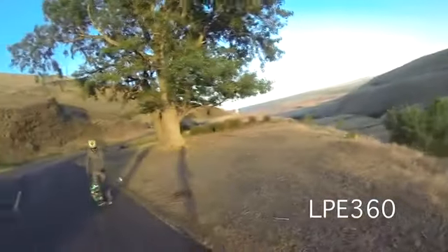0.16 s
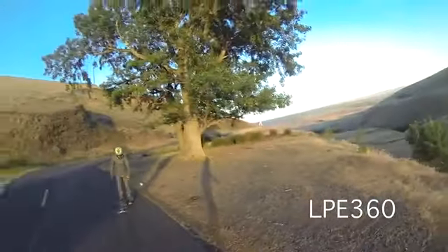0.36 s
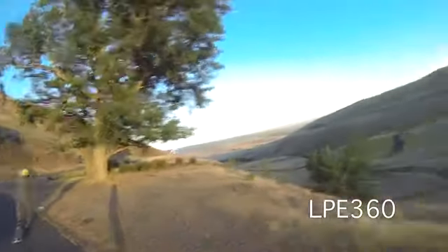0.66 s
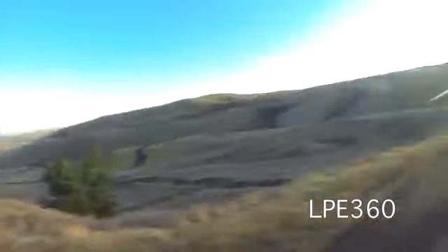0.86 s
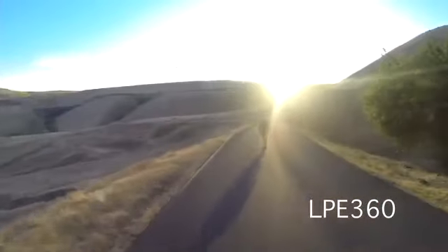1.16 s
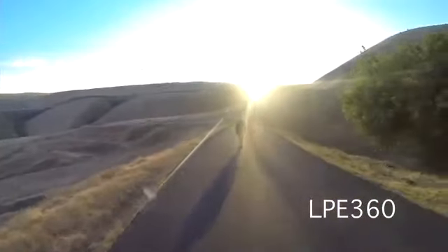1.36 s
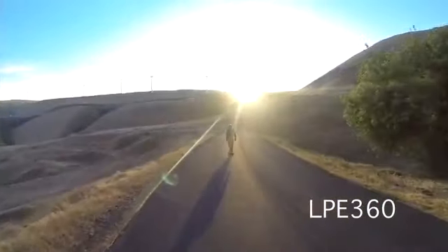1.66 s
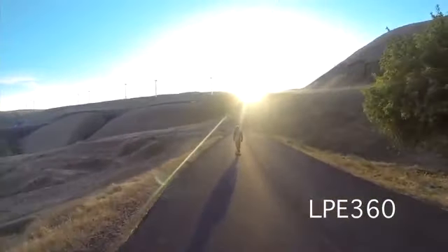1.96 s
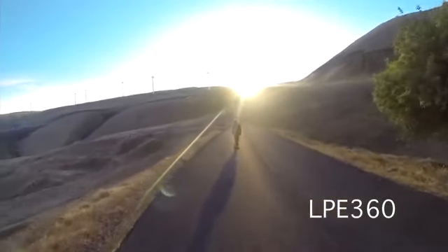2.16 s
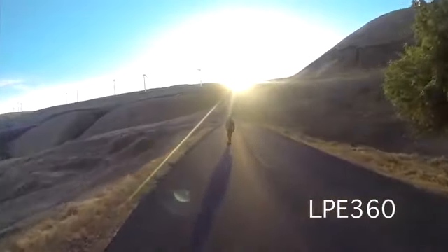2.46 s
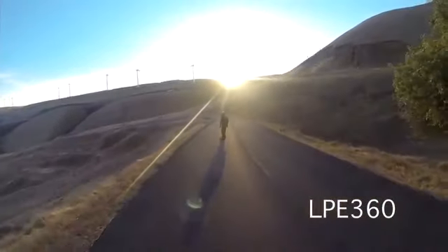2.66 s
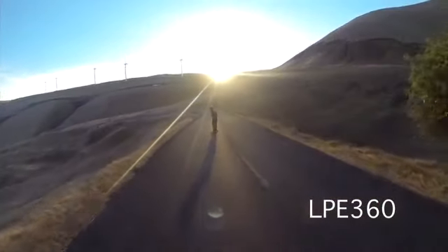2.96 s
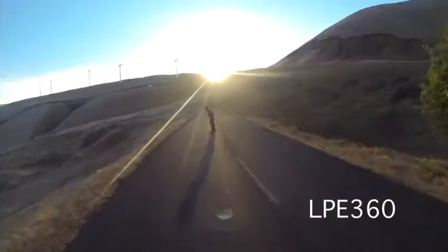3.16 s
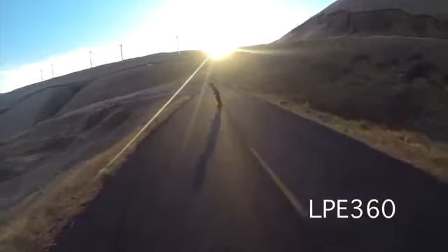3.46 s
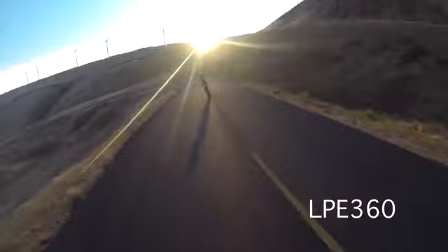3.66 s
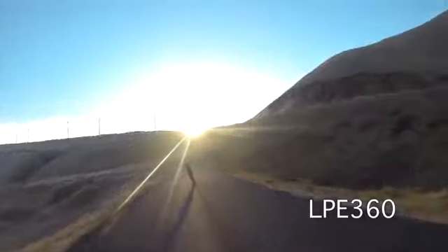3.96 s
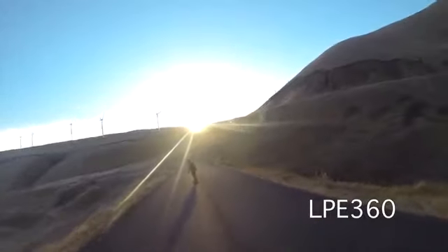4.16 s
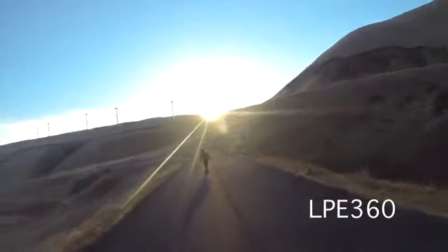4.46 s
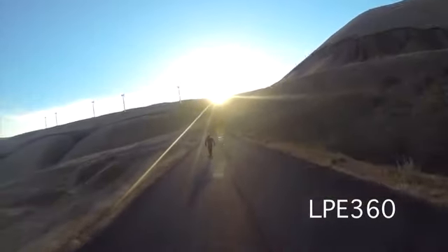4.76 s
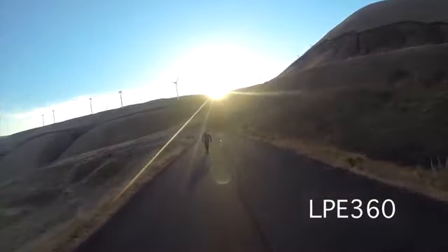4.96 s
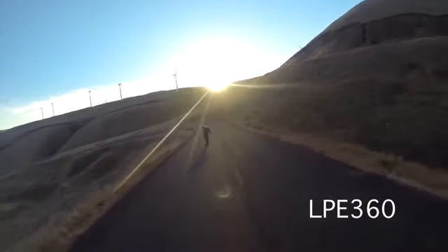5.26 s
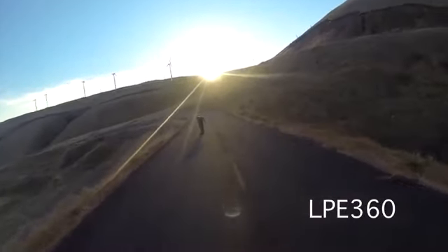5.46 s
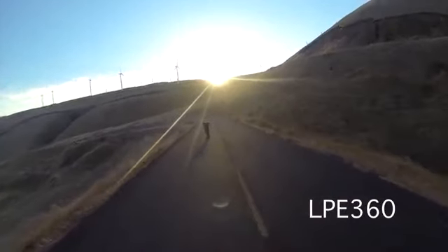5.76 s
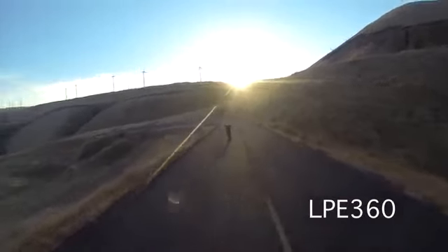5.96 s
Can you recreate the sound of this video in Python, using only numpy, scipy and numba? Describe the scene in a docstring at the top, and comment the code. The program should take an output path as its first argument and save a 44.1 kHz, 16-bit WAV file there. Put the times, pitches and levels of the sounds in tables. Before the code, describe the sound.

Close, muffled wind rumbles on a sealed camera case. Small wheel knocks and dry scrapes come first, then mostly booming air with isolated deep buffets that overload and crackle. Wheel noise grows in patches, with a brief hiss of carving near three seconds. After a sharp flicked-stone tick and a huge thump, a grainy midrange wheel roar takes over, uneven but sustained.

```python
"""Wind booms on the closed case of a camera carried by a rider, as a longboard runs downhill on rough asphalt.
The board scrapes and knocks in a bend; then the wheels build to a roar, with one flicked stone on the way.
Wind is slow filtered noise with single big pressure swings; wheels and sand are thousands of tiny impacts.
Hard buffets drive the camera's stepping limiter, which crackles and ducks everything for a moment."""
import sys
import numpy as np
from scipy import signal
from scipy.fft import rfft, irfft
from scipy.io import wavfile
from scipy.ndimage import uniform_filter1d
from numba import njit

SR = 44100
rng = np.random.default_rng(int(sys.argv[2]) if len(sys.argv) > 2 else 0)


def transcribe(signal):
    """Save signal, clipped to [-1, 1], as a 16-bit WAV file at the path in sys.argv[1]."""
    frames = np.atleast_2d(signal).T
    limited = np.clip(frames, -1, 1)
    pcm = np.round(limited * 32767).astype(np.int16)
    wavfile.write(sys.argv[1], SR, pcm)


N = 269010
T = np.arange(N) / SR  # time in seconds

# All levels of the sources are those ahead of the limiter.
# The ride, louder with speed and a coarser road. Each row: time in seconds, wheel roar in dB.
RIDE = [(0, -68), (.9, -62), (1.4, -65.5), (1.8, -62), (2.1, -65), (2.55, -61), (2.9, -56.5), (3.15, -61),
        (3.45, -56), (3.66, -52), (3.92, -55), (4.01, -54.5), (4.09, -47.5), (4.18, -51), (4.32, -44),
        (4.65, -45.5), (5.0, -46.5), (5.33, -51), (5.45, -48), (5.55, -49), (5.75, -48), (5.95, -44.5),
        (6.1, -46.5)]
REFERENCE_ROAR_DB = -47  # the roar at which the levels of air and edge hiss are given


def undb(db):
    """Decibels to gain."""
    return 10 ** (np.asarray(db) / 20)


def curve(table, axis=1):
    """One column of a table, joined by straight lines in time."""
    rows = np.array(table)
    return np.interp(T, rows[:, 0], rows[:, axis])


def unit(x):
    """Scale to rms 1."""
    return x / np.sqrt(np.mean(x ** 2))


def colour(x, points):
    """Filter through a spectrum of (Hz, dB) points, rolled off an octave beyond either end; rms 1."""
    hz, db = np.transpose(points)
    f = np.maximum(np.fft.rfftfreq(N, 1 / SR), 1)
    low_end = 1 + (hz[0] / 2 / f) ** 6
    high_end = 1 + (f / hz[-1] / 2) ** 6
    gain = undb(np.interp(np.log(f), np.log(hz), db)) / np.sqrt(low_end * high_end)
    return unit(irfft(rfft(x) * gain, N))


def walk(rate):
    """Random levels held about 1 / rate seconds and smoothed twice; rms near 1."""
    size = max(int(SR / rate), 1)
    held = np.repeat(rng.standard_normal(N // size + 1), size)
    smooth = uniform_filter1d(uniform_filter1d(held, size), size)
    return unit(smooth)[:N]


def swell(s, width_s):
    """A smooth rise to 1 and fall around one moment."""
    return np.exp(-.5 * ((T - s) / width_s) ** 2)


def pace():
    """The wheel roar against the reference roar, in dB."""
    return curve(RIDE) - REFERENCE_ROAR_DB


def eddies(points, evenness):
    """Low turbulence whose swings are evened out towards one size."""
    z = signal.hilbert(colour(rng.standard_normal(N), points))
    return unit(z.real / (np.abs(z) + 0.22) ** np.clip(evenness, 0, 1))


def grit(per_s, spread_db):
    """Tiny impacts at random moments; a positive spread makes a few of them larger, a negative one smaller."""
    hit = rng.random(N) < per_s / SR
    size_db = spread_db * np.minimum(rng.exponential(size=N), 4)
    return hit * rng.standard_normal(N) * undb(size_db)


def electronics(hiss_db=-69, whine_db=-78.0):
    """The camera's own hiss and a thin whine whose phase creeps ahead and slips back once a frame."""
    # Spectrum of the hiss. Each row: frequency in Hz, relative level in dB per Hz.
    hiss_colour = [(1000, -3.5), (2600, 9), (3600, 2), (4900, 1), (5170, 6.5), (5400, -0.5), (6500, -3),
                   (7600, -1.5), (9000, -6.5), (10300, -7.5), (11300, -6.5), (12000, -15.5), (13500, -13.5)]
    whine_hz, frame_hz = 10645, 48
    phase = 2 * np.pi * (whine_hz * T + 0.24 * (T * frame_hz % 1))
    hiss = colour(rng.standard_normal(N), hiss_colour)
    return undb(hiss_db) * hiss + undb(whine_db) * unit(np.sin(phase))


def crackles():
    """Each crackle is one sharp edge that relaxes at once."""
    # Lone dry crackles after the hardest buffet. Each row: start in seconds, peak level in dB.
    crackle_rows = [(3.8625, -34), (3.869, -38), (3.873, -37), (3.930, -45), (3.945, -40), (3.953, -36),
                    (3.9705, -37), (3.979, -45.5), (3.9835, -44), (4.015, -47)]
    relax_s = 0.00019
    out, t = np.zeros(N), T[:SR // 100]
    for s, db in crackle_rows:
        start = int(s * SR)
        out[start:start + len(t)] += undb(db) * np.exp(-t / relax_s)
    return out


def air():
    """Air rushes past the case as fluttering noise, stronger as the ride picks up."""
    # Spectrum of the rush at the case. Each row: frequency in Hz, relative level in dB per Hz.
    air_colour = [(70, -12.5), (140, 2.5), (250, 0), (350, -4), (470, -5.5), (650, -10), (900, -15.5),
                  (1500, -15), (3000, -37), (6000, -58.5)]
    air_db, db_per_roar_db = -49.5, .47  # level at the reference roar; dB gained per dB of roar
    rush = colour(rng.standard_normal(N), air_colour)
    return rush * undb(air_db + db_per_roar_db * pace() + 1.2 * walk(25))


def wind():
    """Eddies boom on the case; a buffet is one big pressure swing that displaces the smaller ones and rings off."""
    # Strength of the wind on the case. Each row: time in seconds, rumble level in dB before gusts and flutter.
    rumble_levels = [(0, -27), (.7, -26.5), (1.25, -23.5), (1.5, -25.5), (2.05, -20), (2.35, -23.5),
                     (3.15, -23.5), (3.55, -26.5), (4.3, -37), (4.68, -24), (5.35, -27.5), (5.8, -28),
                     (6.1, -22)]
    # Gusts (+) and lulls (-) passing over the rumble. Each row: middle in seconds, change in dB.
    gusts = [(.27, 10), (.42, -8), (0.501, 6.5), (0.789, -8), (1.009, -12.5), (4.72, 3), (4.829, -10.5),
             (5.45, -14), (5.701, 7), (5.84, 7), (5.96, -11)]
    # Buffets. Each row: crest of the first swing in seconds, level in dB, swing rate in Hz,
    # seconds from that crest to the fullest swell, width in swings.
    buffet_rows = [(0.892, -12.5, 39, 0.0089, 0.43), (1.1205, -0.5, 45.2, 0.013, 0.49),
                   (2.4534, -7.5, 46.2, 0.0066, 0.54), (2.6573, -0.45, 48, 0.009, 0.53),
                   (2.8358, -3, 46.8, 0.0063, 0.47), (3.047, -7, 54.7, 0.0066, 0.55),
                   (3.7965, 3, 44.05, .0122, .39), (3.835, -2.5, 25, 0.0022, 0.38),
                   (3.9645, -6.5, 24.14, .001, .3)]
    # Spectrum of the rumble. Each row: frequency in Hz, relative level in dB per Hz before evening out.
    rumble_colour = [(20, -16), (33, -10.5), (46, -2), (58, 0), (70, -3), (85, -14.5), (105, -22.5),
                     (125, -39.5), (155, -29.5), (200, -54.5)]
    # Spectrum of the slow sway of large eddies. Each row: the same two columns, in Hz and dB per Hz.
    sway_colour = [(9, -4), (14, 0), (24, -2), (36, -18), (60, -36.5)]
    gust_width_s, flutter_db, flutter_per_s = 0.028, 1.0, 14
    sway_db = -34  # outside the patch of rough air
    rough_air_s, rough_air_db, rough_air_width_s = 3.953, 14.5, 0.17

    gusts_db = sum(db * swell(s, gust_width_s) for s, db in gusts)
    rumble_db = curve(rumble_levels) + gusts_db + flutter_db * walk(flutter_per_s)
    rumble = eddies(rumble_colour, evenness=0.36) * undb(rumble_db)
    rough_db = rough_air_db * swell(rough_air_s, rough_air_width_s)
    sway = eddies(sway_colour, evenness=0.92) * undb(sway_db + rough_db)
    buffets, calm = np.zeros(N), np.ones(N)
    for crest_s, db, hz, lag_s, swings in buffet_rows:
        push = swell(crest_s + lag_s, swings / hz)  # with a long lag the rebound outdoes the first swing
        buffets += undb(db) * push * np.cos(2 * np.pi * hz * (T - crest_s))
        calm *= 1 - swell(crest_s + lag_s, 1 / hz)
    return (rumble + sway) * calm + buffets


def knocks(tick_db=-24, crunch_db=-12.0, crunch_t60=0.012):
    """Each knock is a tick of contact, a crunch of grit and a short ring of the case, brighter when harder."""
    # Knocks of wheels and grit. Each row: start in seconds, peak of the ring in dB, hardness in dB per octave.
    knock_rows = [(0.209, -41, -17), (0.4404, -46, 25), (0.4887, -31, -23), (0.504, -38, -22),
                  (0.524, -37, -24), (0.6289, -39.5, -20), (0.633, -43, -21), (0.6706, -45, -19),
                  (0.7139, -39, -14), (0.7185, -39, -13), (0.762, -42, -16), (0.883, -49.5, 22),
                  (3.7636, -26, -5), (3.7671, -35, -8)]
    # Modes of the camera case. Each row: frequency in Hz before detuning, level in dB before the tilt of
    # hardness, time to fade 60 dB in seconds.
    case_modes = [(1370, 10, 0.0094), (1470, 9.5, 0.016), (1730, -1, 0.018), (2080, -5, 0.0092),
                  (2340, 6.5, 0.017), (2570, 2.5, 0.015), (3400, -20, 0.0088)]
    # Crunch of grit under a knocking wheel. Each row: frequency in Hz, relative level in dB per Hz.
    crunch_colour = [(700, -12), (1250, 6), (2700, -5), (3050, -18), (4500, -19), (8000, -42)]
    out, t = np.zeros(N), T[:SR // 10]
    grains = colour(grit(per_s=4100, spread_db=-0.5), crunch_colour)
    push = 1 - np.exp(-t / 0.0018)  # soft urethane takes a moment to push
    for s, db, tilt_db in knock_rows:
        ring = np.zeros(len(t))
        for hz, mode_db, t60 in case_modes:
            detuned_hz = hz * (1 + 0.028 * rng.standard_normal())
            fading_db = mode_db + tilt_db * np.log2(hz / 1400) - 60 * t / t60
            ring += undb(fading_db) * np.sin(2 * np.pi * detuned_hz * t)
        ring *= push
        contact = uniform_filter1d(rng.standard_normal(len(t)), size=3)
        tick = contact * np.exp(-t / 0.00036) * undb(tick_db + tilt_db)
        start = int(s * SR)
        fading_crunch_db = crunch_db + min(tilt_db, 0) / 2 - 60 * t / crunch_t60
        crunch = push * grains[start:start + len(t)] * undb(fading_crunch_db)
        out[start:start + len(t)] += undb(db) * (ring / np.abs(ring).max() + tick + crunch)
    return out


def scrape():
    """Sideways in the bend the wheels grip and slip in uneven chatter over a finer rasp, and grind sand."""
    # Skids, each biting at once, holding and dying away. Each row: start in seconds, level in dB,
    # hold in seconds from the start, time to fade 60 dB in seconds, sand against rasp in dB.
    skids = [(.21, -61.5, 0.0048, 1, -15), (0.274, -57.5, 0.02, .35, -15), (0.44, -38, 0.021, 0.12, -25),
             (0.485, -51, .05, 0.63, -29), (0.699, -50.5, 0.016, 0.3, -15), (0.739, -54, 0.011, 0.1, -15),
             (0.812, -60.5, 0.0052, 0.7, -11)]
    # Spectrum of chatter and rasp. Each row: frequency in Hz, relative level in dB per Hz.
    scrape_colour = [(200, -17), (570, -19), (850, -19), (1100, -9.5), (1280, 3.5), (1550, 1), (1810, 2),
                     (1990, -15.5), (2300, -33), (2550, -20), (3000, -33.5), (3400, -18), (3800, -32),
                     (5500, -39), (7000, -35.5), (10000, -45)]
    # Sand ground under a skidding wheel. Each row: frequency in Hz, relative level in dB per Hz.
    sand_colour = [(400, 4), (900, -2), (2100, 0), (3000, -2), (3450, 4), (4200, -6), (5500, -18),
                   (7000, -20), (10000, -26)]
    chatter_hz, chatter_spread, chatter_scatter_db = 279.5, .35, 2.0  # middle rate, its log spread, level scatter
    rasp_db = -3.5  # against the chatter
    attack_s = 0.0035

    rate_hz = chatter_hz * np.exp(chatter_spread * walk(300))
    cycles = np.floor(np.cumsum(rate_hz) / SR)
    # one impulse at each slip
    chatter = np.diff(cycles, prepend=0) * undb(chatter_scatter_db * rng.standard_normal(N))
    slips = unit(chatter) + undb(rasp_db) * unit(grit(per_s=7900, spread_db=-4.0))
    rasp = colour(slips, scrape_colour)
    sand = colour(grit(per_s=3200, spread_db=1.5), sand_colour)
    out = np.zeros(N)
    for s, db, hold_s, t60, sand_db in skids:
        age = np.maximum(T - s, 0)
        fade = np.exp(-np.log(1000) * np.maximum(age - hold_s, 0) / t60)
        grip = np.minimum(age / attack_s, 1) * fade
        out += undb(db) * grip * (rasp + undb(sand_db) * sand)
    return out


def wheels():
    """Stones of the asphalt drum on the wheels, thousands a second, in rough and smooth patches; carving hisses."""
    # Spectrum of the drumming. Each row: frequency in Hz, relative level in dB per Hz.
    wheel_colour = [(600, -38), (950, -20), (1130, -11), (1270, 1), (1400, 2), (1580, 0), (1750, -7),
                    (1950, -18.5), (2500, -27.5), (3200, -31.5), (4400, -42.5), (7000, -53.5),
                    (12000, -54.5)]
    # Spectrum of the wheels hissing on their edges. Each row: frequency in Hz, relative level in dB per Hz.
    edge_colour = [(1500, -24.5), (1950, 3.5), (2450, 3.5), (2750, -2), (3100, -12), (4500, -19.5),
                   (7000, -38)]
    # Carves. Each row: middle in seconds, rise of the edge hiss in dB, width in seconds.
    carves = [(2.97, 13, 0.053), (4.07, 2, 0.06), (4.7, 1.5, 0.2)]
    edge_db, db_per_roar_db = -61, 1  # level at the reference roar outside carves; dB gained per dB of roar
    patches = undb(1.02 * walk(70) + .6 * walk(6.2))
    drumming = colour(grit(per_s=4200, spread_db=-1.0) * patches, wheel_colour)
    edge = colour(grit(per_s=8000, spread_db=1.0) * patches, edge_colour)
    carving_db = sum(db * swell(s, width_s) for s, db, width_s in carves)
    edge_gain = undb(edge_db + db_per_roar_db * pace() + carving_db)
    return drumming * undb(curve(RIDE)) + edge * edge_gain


def scene():
    """Everything that reaches the recorder, in one channel."""
    ride = wheels() + scrape() + knocks()
    return (electronics() + crackles() + air() + wind() + ride)[None]


@njit
def limiter(x, jitter, top, calm, step_db, finer_db, attack_db_per_s, release_db_per_s, hold_s, rise_s, fall_s, slew):
    """Gain falls in sharp steps, faster further over the top and finer when deep; once calm it climbs back."""
    y = np.empty(len(x))
    heard, cut, stepped, wait, gain = 0., 0., 0., 0., 1.  # cut is the wanted reduction in dB, stepped the one set
    for i in range(len(x)):
        y[i] = x[i] * gain
        # follow the level of the output
        heard += (abs(y[i]) - heard) / (SR * (rise_s if abs(y[i]) > heard else fall_s))
        wait = hold_s if heard > calm else wait - 1 / SR
        if heard > top:
            cut += jitter[i] * attack_db_per_s * (heard / top - 1) / SR
        elif wait < 0:
            cut = max(cut - jitter[i] * release_db_per_s / SR, 0.)
        step = step_db * np.exp(-stepped / finer_db)
        if cut > stepped + step:
            stepped += step
        elif cut < stepped:
            stepped = max(stepped - step, 0.)
        # the gain reaches each new step within a few samples
        gain += min(slew, 1.) * (10 ** (-stepped / 20) - gain)
    return y


def record(dry):
    """The camera's stepping limiter, then a steep low-pass on the treble."""
    jitter = undb(1.1 * walk(2500))
    top, calm = float(undb(-10.5)), float(undb(-12.5))
    held = limiter(dry[0], jitter, top, calm, step_db=0.75, finer_db=14.0,
                   attack_db_per_s=2699.5, release_db_per_s=145., hold_s=0.025,
                   rise_s=0.00054, fall_s=.002, slew=0.35)
    top_hz = 13800
    low_pass = signal.ellip(8, .2, 70, top_hz, fs=SR, output="sos")
    return signal.sosfilt(low_pass, held)[None]


dry = scene()
out = record(dry)
transcribe(out)
```